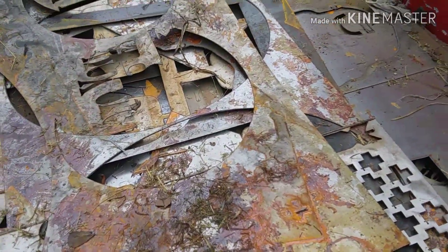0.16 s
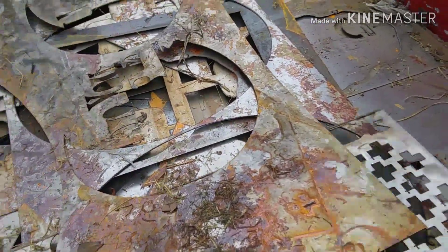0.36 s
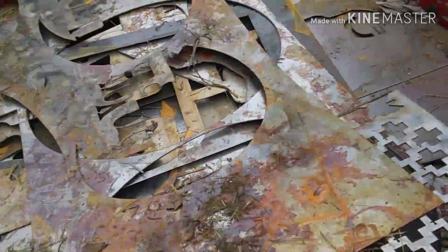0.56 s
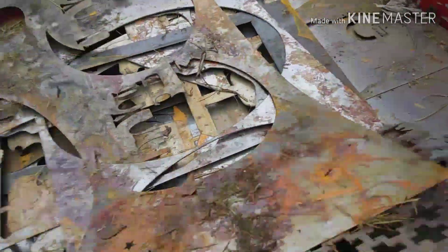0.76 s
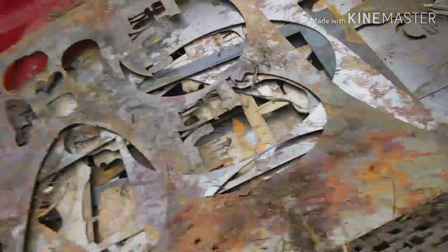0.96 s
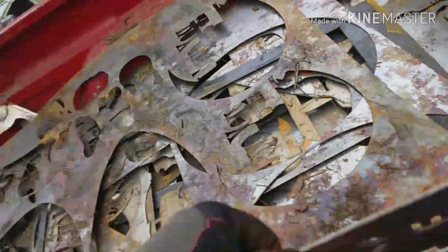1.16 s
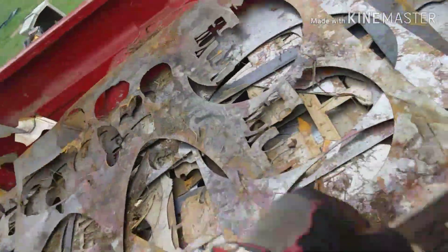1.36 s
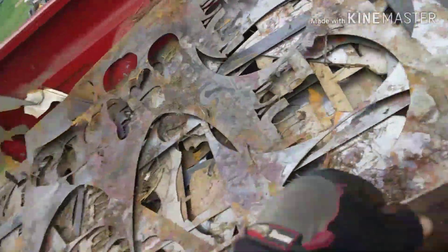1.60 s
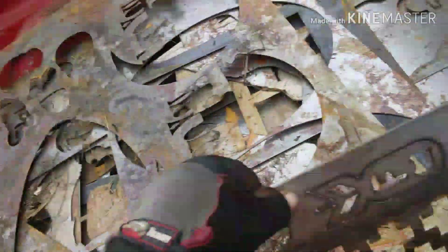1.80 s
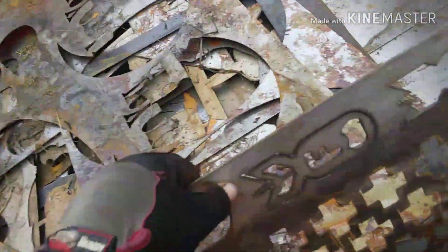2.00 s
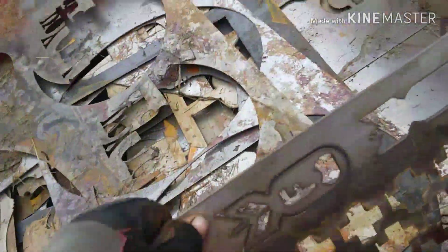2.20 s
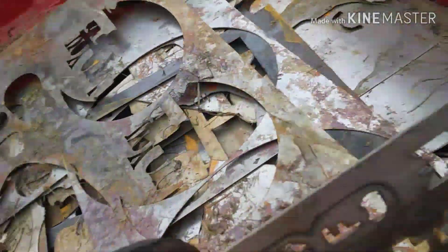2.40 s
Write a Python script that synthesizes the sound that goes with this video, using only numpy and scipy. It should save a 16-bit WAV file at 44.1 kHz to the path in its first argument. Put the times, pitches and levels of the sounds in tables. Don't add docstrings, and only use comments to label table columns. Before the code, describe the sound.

Harsh metallic dragging of sheet steel, with rattling edges, ringing twangs and a quick fade

```python
import sys
import numpy as np
from scipy import signal
from scipy.fft import rfft, irfft
from scipy.io import wavfile
from scipy.ndimage import uniform_filter1d

SR = 44100
rng = np.random.default_rng(int(sys.argv[2]) if len(sys.argv) > 2 else 0)


def elevation(decibels):
    levels = np.asarray(decibels, float)
    return 10 ** (levels / 20)


def master(y):
    cut = np.clip(np.atleast_2d(y).T, -1, 1)
    pcm = np.round(cut * 32767)
    wavfile.write(sys.argv[1], SR, pcm.astype(np.int16))


N = 108045

# time_s, ringing_db, edge_grit_over_ringing_db, hardness_db_per_octave
DRAG_PATH = [(0, -86, -34, 0), (.03, -70, -30, 4), (.065, -46, -28, -0.5), (.185, -52.5, -41, -3.5),
             (.22, -33.5, -35, -1.5), (.255, -16, -23, 0.5), (.42, -19, -16, -3), (.5, -29, -19, -4.5),
             (.6, -15.5, -21, 1), (.85, -15, -16, 1), (1.0, -18, -7.5, 1.5), (1.24, -14.5, -12.5, 1),
             (1.47, -13.5, -10.5, 0.5), (1.7, -15, -18, 0), (1.95, -22, -19, -0.5),
             (2.121, -32.5, -24.5, -2.5), (2.27, -43, -40, -3.5), (2.45, -43.5, -43, 2.5)]
# start_s, treble_peak_db, body_over_treble_db, rattle_length_s
EDGE_BLOWS = [(.032, -71, 14.5, 0.011), (0.055, -64.5, 19.5, 0.025), (.090, -42.5, 6, 0.0059),
              (0.1953, -51, 24.5, 0.018), (0.242, -38, 20, 0.035), (0.345, -28, 21.5, 0.0057),
              (0.405, -18.5, -15, 0.015), (0.472, -20.5, 0, 0.014), (.5175, -20.5, -3, 0.024),
              (0.563, -20, 10, 0.0077), (0.591, -11, -24, 0.015), (0.64, -28, 13, 0.0071),
              (.683, -14, 2, 0.027), (0.781, -21.5, 14, 0.0071), (.871, -22, -8, 0.0081),
              (0.969, -16.5, -1.5, .05), (1.021, -22, 4, 0.022), (1.109, -15.5, -12, 0.022),
              (1.146, -14.5, -4, 0.02), (1.278, -15, -2, 0.033), (1.367, -13, -23, 0.085),
              (1.643, -31, 2, 0.0086), (1.861, -27.5, -2, .015), (1.914, -29, 11, 0.021),
              (2.02, -51, 0, 0.014), (2.048, -42.5, 11, 0.03), (2.176, -37, 1.5, 0.021),
              (2.306, -50.5, 15, 0.02), (2.335, -47, 16, 0.028), (2.345, -37.5, 3, 0.023)]
# start_s, peak_db, pitch_hz, time_to_fall_60_db_s
LOOSE_TONGUES = [(.032, -46, 1284, .1), (0.051, -42, 2635, 0.22), (.06, -39.5, 1326, .2),
                 (.095, -37.5, 1160, 0.13), (.2, -32, 755, 0.3), (0.229, -15, 1327, 0.13),
                 (0.254, -9.5, 1705, 0.19), (0.266, -18, 1055, 0.17), (.275, -13.5, 336, 0.061),
                 (.293, -19, 353, 0.11), (0.287, -10, 1780, .15), (0.241, -13.5, 1508, 0.2),
                 (0.342, -12.5, 325, 0.046), (0.346, -5.5, 1436, 0.054), (.471, -14, 308, 0.059),
                 (0.519, -17, 2570, 0.044), (0.532, -15, 266, 0.063), (.572, -20.5, 641, 0.16),
                 (.568, -25.5, 290, 0.18)]
# start_s, peak_db, pitch_hz, time_to_fall_60_db_s
SNAP_FLAT = [
    (.5645, -5, 1620, .05),
    (.569, -6, 760, .16),
    (.583, -6, 820, .16),
]
# frequency_hz, level_db
BODY_TONE = [(100, -43.5), (190, -27), (330, -12), (600, -8.5), (900, -0.5), (1700, 1), (2600, -2.5),
             (5000, -13.5)]
# frequency_hz, level_db
EDGE_TONE = [(800, -11), (2000, 1), (5000, 2.5), (6500, -3.5), (7500, -4), (9600, -6), (12000, -15.5),
             (15500, -28)]
# frequency_hz, time_to_fall_60_db_s
BODY_RING = [(200, 0.48), (1000, 0.39), (3000, 0.58), (6000, 0.067), (10000, 0.05), (15000, .07)]
# frequency_hz, time_to_fall_60_db_s
EDGE_RING_TIMES = [(1000, 0.087), (5000, 0.34), (10000, 0.043), (15000, .11)]
# frequency_hz, level_db
YARD_TONE = [(40, -12), (120, -3), (200, 1), (330, 13), (600, -38), (1500, -10), (4000, -43), (12000, -58)]
# frequency_hz, level_db
MIC_COLOUR = [(3000, -0.5), (5800, 0.5), (6800, -3.5), (7600, -5), (9000, -1), (11000, 0), (13000, -2.5)]

SLIPS_PER_S, RATTLE_PER_S, SLIP_SPREAD_DB = 9000, 9000, 2.5
BODY_DB, GRIT_DB, CLATTER_DB, JUDDER_DB = 0.5, 4.5, -1.5, 0.85
BLOW_RISE_S, TWANG_RISE_S = 0.0016, 0.0026
TWANG_WOBBLE = 0.25
WANDER_S = 0.035
MODE_SHARE = 0.8
BODY_ROLL_DB = -7.5
DIRECT_DB = 1
LEAD = 128
BED_HZ, BED_T60_S, BED_DB = 265, 2.6, -30
SCREECH_S, SCREECH_LENGTH_S, SCREECH_DB = 0.97, 0.099, -26.5
YARD_DB = -65
LOW_CUT_HZ, CLIP_LEVEL, KNEE = 235, 0.525, 10


def evened(x):
    return x / np.sqrt(np.mean(x ** 2) + 1e-20)


def read(points, hz):
    f, value = np.transpose(points)
    return np.interp(np.log(hz + 1), np.log(f + 1), value)


def smooth_noise(shape, width):
    once = uniform_filter1d(rng.standard_normal(shape), width)
    return evened(uniform_filter1d(once, width))


def clicks(per_s):
    size_db = SLIP_SPREAD_DB * np.minimum(rng.exponential(1, N), 5)
    size = elevation(size_db) * rng.choice([-1, 1], N)
    happens = rng.random(N) < per_s / SR
    return evened(size * happens)


def drag():
    t = np.arange(N) / SR
    s, db, grit_db, _ = np.transpose(DRAG_PATH)
    judder = JUDDER_DB * smooth_noise(N, 900)
    level = np.interp(t, s, db) + judder
    grit_level = level + judder + np.interp(t, s, grit_db)
    slide = clicks(SLIPS_PER_S) * elevation(level + BODY_DB)
    grit = clicks(SLIPS_PER_S) * elevation(grit_level + GRIT_DB)
    return slide, grit


def clatter():
    t = np.arange(N) / SR
    body, edge = np.zeros(N), np.zeros(N)
    for s, db, body_db, length in EDGE_BLOWS:
        rise = np.clip((t - s) / BLOW_RISE_S, 0, 1)
        decay = np.exp(-np.maximum(t - s, 0) / length)
        shape = elevation(db + CLATTER_DB) * rise * decay
        body += shape * elevation(body_db)
        edge += shape
    rattle = clicks(RATTLE_PER_S)
    return body * rattle, edge * rattle


def sheet(colour, ring, roll_db, tilt_db):
    size = 16384
    hz = np.fft.rfftfreq(size, 1 / SR)
    pick, phase = rng.random((2, len(tilt_db), len(hz)))
    tone_db = read(colour, hz) + roll_db * np.maximum(hz - colour[-1][0], 0) / 1000
    tone_db = tone_db + tilt_db[:, None] * np.log2((hz + 100) / 1500)
    strength = (pick < MODE_SHARE) * elevation(tone_db) / np.sqrt(read(ring, hz))
    modes = irfft(strength * np.exp(2j * np.pi * phase))
    f, t, z = signal.stft(modes, SR, nperseg=256, noverlap=128)
    decay = elevation(-60 * t / read(ring, f)[:, None])
    struck = signal.istft(z * decay, SR, nperseg=256, noverlap=128)[1]
    rise = np.hanning(2 * LEAD)
    struck[:, :LEAD] *= rise[:LEAD] ** 2
    tick = np.roll(irfft(elevation(tone_db)), LEAD, axis=1)[:, :2 * LEAD] * rise
    ring_size = np.linalg.norm(struck, axis=1, keepdims=True)
    tick *= elevation(DIRECT_DB) * ring_size / np.linalg.norm(tick, axis=1, keepdims=True)
    struck[:, :2 * LEAD] += tick
    return struck / np.linalg.norm(struck, axis=1, keepdims=True)


def moving_contact(force, colour, ring, roll_db):
    hop = round(WANDER_S * SR)
    s, _, _, hardness = np.transpose(DRAG_PATH)
    tilt_db = np.interp(np.arange(N // hop + 2) * WANDER_S, s, hardness)
    fade = np.sin(np.pi * np.arange(2 * hop) / (2 * hop))
    padded = np.pad(force, (hop, 3 * hop))
    out = np.zeros(N + 6 * hop + SR)
    for k, response in enumerate(sheet(colour, ring, roll_db, tilt_db)):
        start = k * hop
        part = signal.fftconvolve(padded[start:start + 2 * hop] * fade, response)
        out[start:start + len(part)] += part
    return out[hop + LEAD:hop + LEAD + N]


def twangs():
    out = np.zeros(N)
    events = LOOSE_TONGUES + SNAP_FLAT
    wobble = TWANG_WOBBLE * smooth_noise((len(events), 2, 8820), 150)
    t = np.arange(wobble.shape[-1]) / SR
    rise = 1 - np.exp(-t / TWANG_RISE_S)
    for (s, db, hz, t60), (level_wobble, phase_wobble) in zip(events, wobble):
        mode = (1 + level_wobble) * np.sin(2 * np.pi * hz * t + phase_wobble)
        at = round(s * SR)
        out[at:at + len(t)] += rise * elevation(db - 60 * t / t60) * mode
    return out


def bed(force):
    t = np.arange(SR) / SR
    low_pass = signal.butter(2, BED_HZ, fs=SR, output="sos")
    boom = signal.sosfilt(low_pass, rng.standard_normal(SR)) * elevation(-60 * t / BED_T60_S)
    return elevation(BED_DB) * signal.fftconvolve(force, boom / np.linalg.norm(boom))[:N]


def screech():
    u = np.clip((np.arange(N) / SR - SCREECH_S) / SCREECH_LENGTH_S, 0, 1)
    swell = np.sqrt(np.abs(np.sin(np.pi * u))) * (u < 1)
    band = signal.butter(2, (8700, 11600), "band", fs=SR, output="sos")
    fine = signal.sosfilt(band, clicks(SLIPS_PER_S))
    return elevation(SCREECH_DB) * swell * evened(fine)


def yard():
    tone = elevation(read(YARD_TONE, np.fft.rfftfreq(N, 1 / SR)))
    hum = irfft(rfft(rng.standard_normal(N)) * tone, N)
    return elevation(YARD_DB) * evened(hum)


def scene():
    slide, grit = drag()
    blow, edge = clatter()
    body_sound = moving_contact(slide + blow, BODY_TONE, BODY_RING, BODY_ROLL_DB)
    edge_sound = moving_contact(grit + edge, EDGE_TONE, EDGE_RING_TIMES, 0)
    mono = body_sound + edge_sound + twangs() + bed(slide + blow) + screech() + yard()
    return np.array([mono, mono])


def roll_off(x):
    return signal.sosfilt(signal.butter(12, 15740, fs=SR, output="sos"), x)


def record(dry):
    colour = elevation(read(MIC_COLOUR, np.fft.rfftfreq(N, 1 / SR)))
    x = irfft(rfft(dry) * colour, N)
    bass_cut = signal.butter(3, LOW_CUT_HZ, "high", fs=SR, output="sos")
    x = signal.sosfilt(bass_cut, x) / CLIP_LEVEL
    mix = CLIP_LEVEL * x / (1 + np.abs(x) ** KNEE) ** (1 / KNEE)
    return roll_off(mix)


dry = scene()
out = record(dry)
master(out)
```